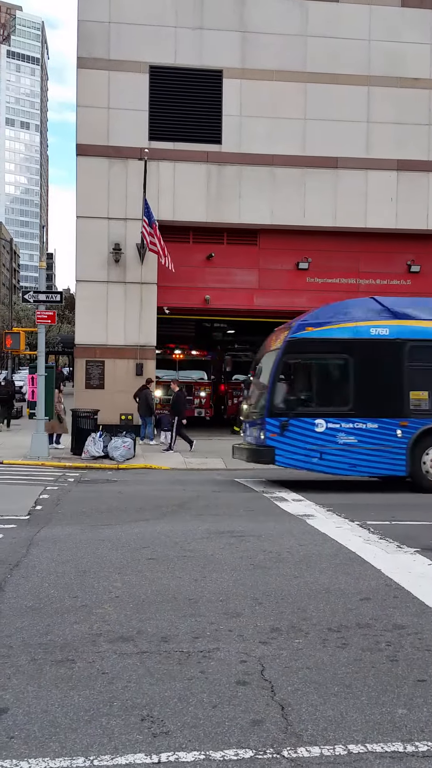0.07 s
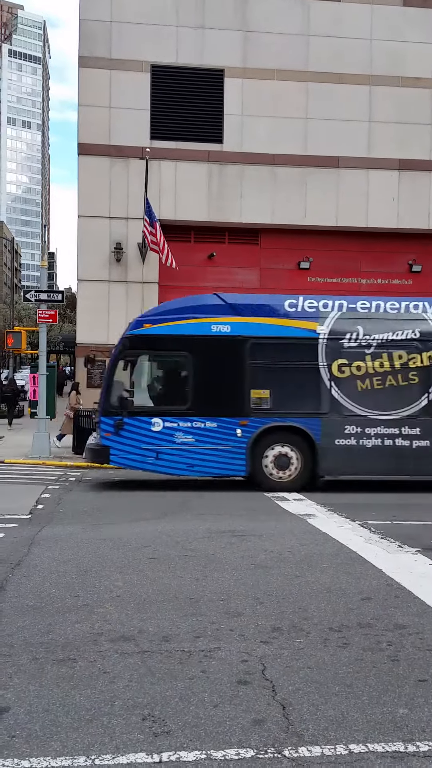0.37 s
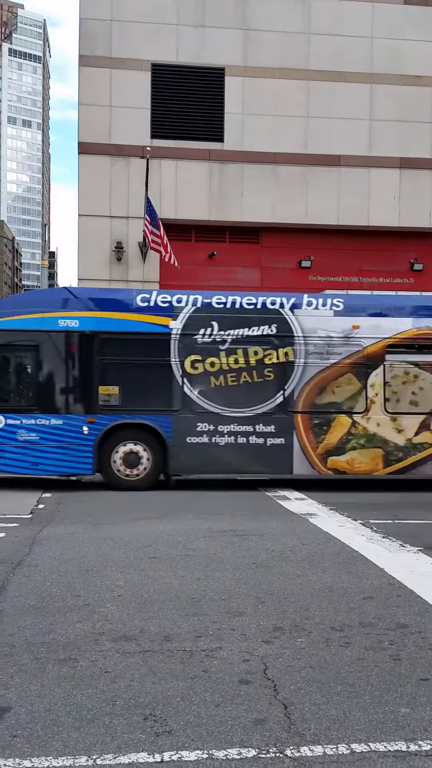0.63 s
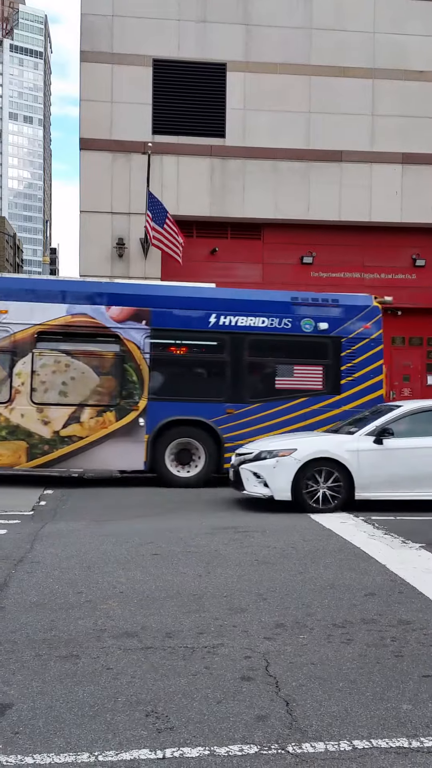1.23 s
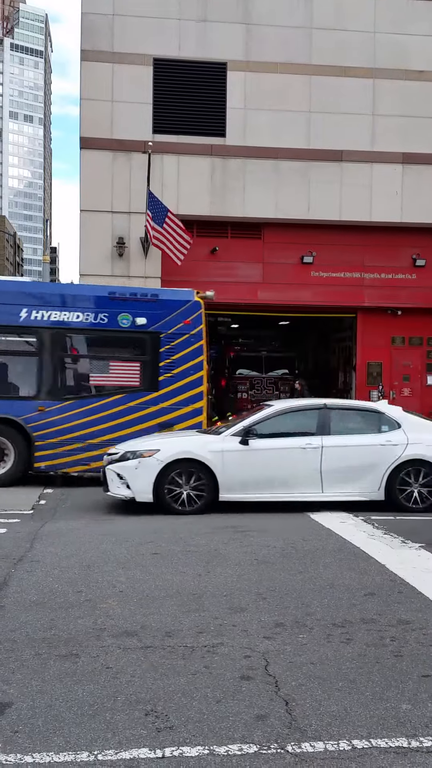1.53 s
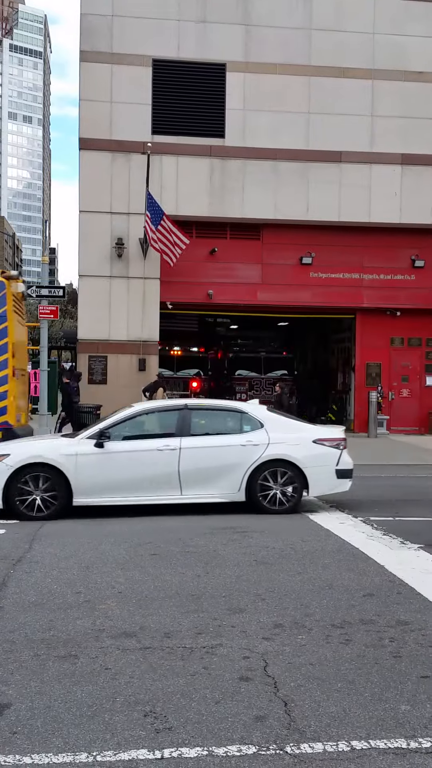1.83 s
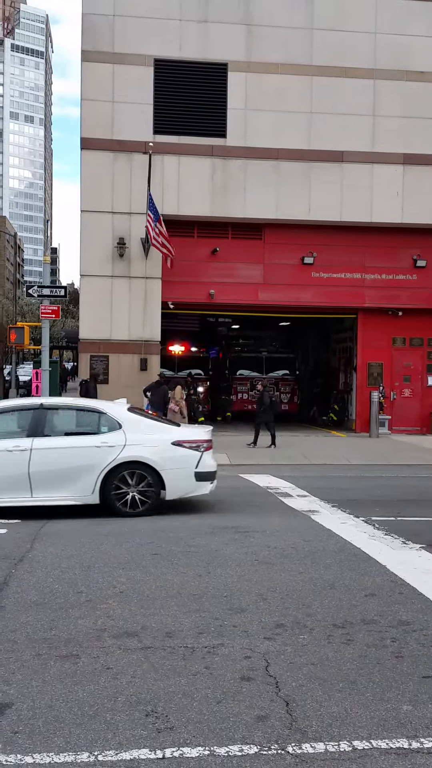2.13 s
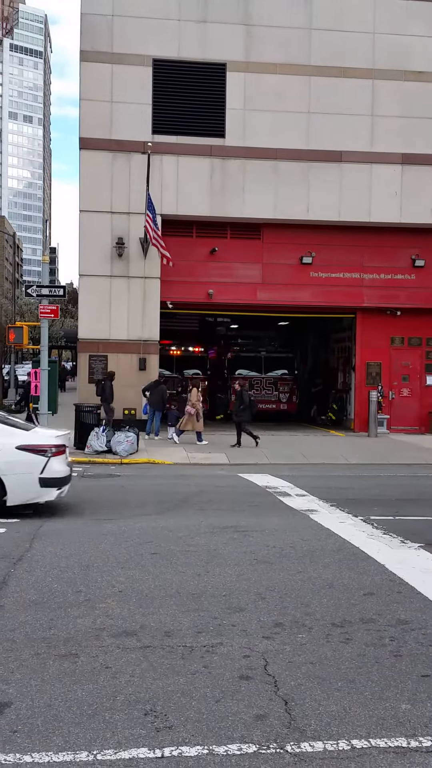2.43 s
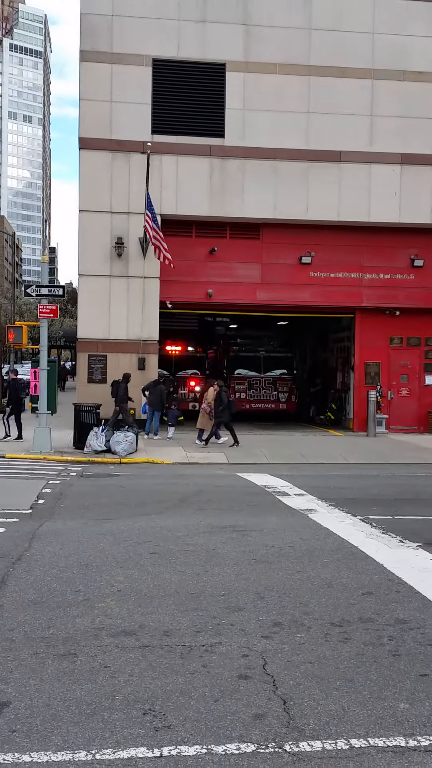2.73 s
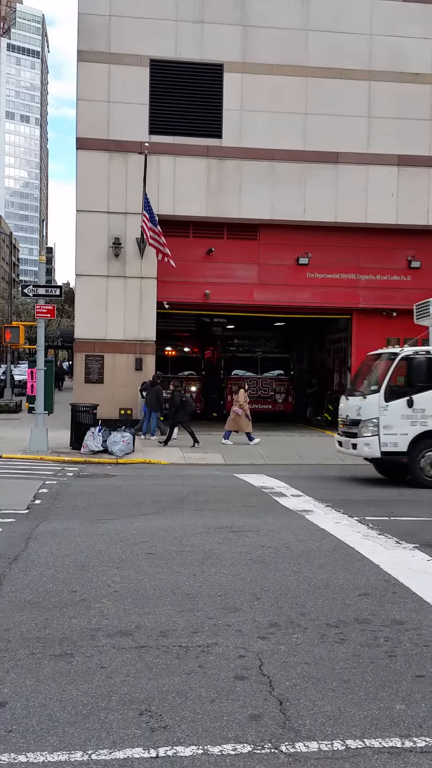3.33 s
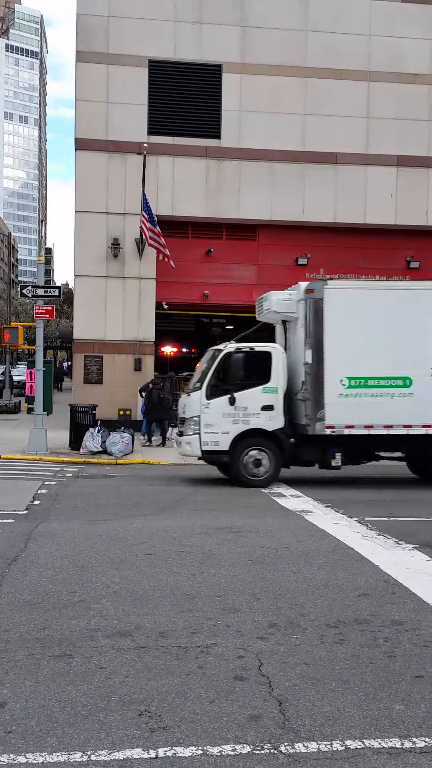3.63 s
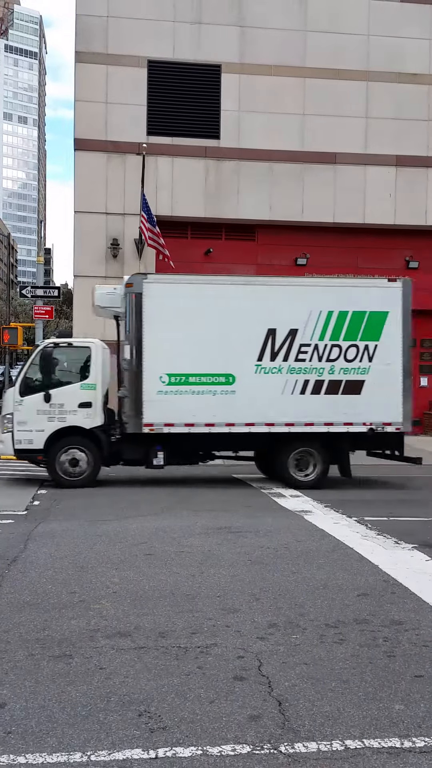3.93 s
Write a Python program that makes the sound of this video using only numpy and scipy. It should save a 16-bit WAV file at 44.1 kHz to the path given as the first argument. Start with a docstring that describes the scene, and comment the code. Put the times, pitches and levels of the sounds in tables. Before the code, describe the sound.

A city bus goes by with a low engine drone, a climbing turbo whistle, a wavering whine and a hiss of air. Tyre roar from a passing car and an approaching truck swells over steady street rumble.

```python
"""Hybrid city bus passing

Tyres roar and sing over the street rumble as a bus, a car and a box truck go by.
The bus's diesel drones, its turbo spools up to a high whistle and its electric drive whines;
air hisses once its rear has passed. Two microphone ports colour the treble differently."""
import sys
import numpy as np
from scipy import signal
from scipy.fft import rfft, irfft
from scipy.io import wavfile

SR = 44100
rng = np.random.default_rng(int(sys.argv[2]) if len(sys.argv) > 2 else 0)


def generate_wav(signal):
    """Clip the signal to [-1, 1] and save it as 16-bit WAV at the path in sys.argv[1]."""
    frames = np.transpose(np.atleast_2d(signal))
    scaled = np.clip(frames, -1, 1) * 32767
    pcm = np.round(scaled).astype(np.int16)
    wavfile.write(sys.argv[1], SR, pcm)


N = 176400


def undb(db):
    """Decibels to gain."""
    return 10 ** (np.asarray(db) / 20)


def unit_rms(x):
    """Scale to rms 1."""
    return x / np.sqrt(np.mean(np.abs(x) ** 2))


def over_time(table):
    """Columns of a time table, interpolated per sample."""
    times_s, *columns = np.array(table, float).T
    return [np.interp(np.arange(N) / SR, times_s, col) for col in columns]


def over_frequency(table):
    """Columns of a frequency table, interpolated per FFT bin on a log axis."""
    points_hz, *columns = np.array(table, float).T
    bins_hz = np.maximum(np.fft.rfftfreq(N, 1 / SR), 1)
    return np.array([np.interp(np.log(bins_hz), np.log(points_hz), col) for col in columns])


def bell(peak_s, sigma_s):
    """Gaussian envelope, peak 1."""
    return np.exp(-.5 * ((np.arange(N) / SR - peak_s) / sigma_s) ** 2)


def flutter(width_hz):
    """Complex low-pass noise, rms 1."""
    hz = np.fft.fftfreq(N, 1 / SR)
    re, im = rng.standard_normal((2, N))
    return unit_rms(np.fft.ifft((re + 1j * im) / (1 + (2 * hz / width_hz) ** 4) ** .5))


def drift(rate_hz):
    """Slow random wander, rms 1."""
    return unit_rms(flutter(2 * rate_hz).real)


def phase_of(hz):
    """Running phase of a pitch curve, random start."""
    return 2 * np.pi * (np.cumsum(hz) / SR + rng.random())


def rough_tone(phase, rough, width_hz):
    """Mono tone that shakes in level and pitch."""
    return unit_rms(((1 + rough * flutter(width_hz)) * np.exp(1j * phase)).real)


def scattered_tone(phase, width_hz):
    """Tone smeared by turbulence and reflections, differently at each port."""
    return unit_rms(np.array([(flutter(width_hz) * np.exp(1j * phase)).real for _ in range(2)]))


def swells(table, rough, width_hz):
    """Sum of rough tones, each under a bell envelope."""
    return sum(undb(db) * bell(peak_s, sigma_s) * rough_tone(phase_of(np.full(N, hz)), rough, width_hz)
               for peak_s, sigma_s, hz, db in table)


# Left/right coherence (frequency [Hz], correlation [-])
COHERENCE = [(30, .85), (80, .87), (280, .96), (600, .87), (1200, .73), (1800, .55), (2500, .3), (4000, .3),
             (7000, .03)]

def stereo_noise(spectrum):
    """Coloured noise, rms 1; channels alike in the bass, unrelated in the treble."""
    correlation = np.clip(over_frequency(COHERENCE)[0], -1, 1)
    mid, side = rfft(rng.standard_normal((2, N)))
    channels = mid * np.sqrt(1 + correlation) + side * np.sqrt(1 - correlation) * np.array([[1], [-1]])
    return unit_rms(irfft(channels * undb(over_frequency(spectrum)), N))


# Street background (frequency [Hz], relative density [dB])
STREET_SPECTRUM = [(100, -7), (700, 5.5), (1800, -12), (3000, -15), (4300, -15.5), (5200, -26), (6500, -34),
                   (8500, -42), (10500, -28), (12300, -22), (14000, -28), (16000, -32)]

def street(level_db=-41):
    """Steady wash of the distant street."""
    return undb(level_db) * stereo_noise(STREET_SPECTRUM)


# Traffic envelopes (time [s], rumble level [dB], roar level [dB])
TRAFFIC_LEVELS = [(0, -22.5, -36), (.35, -26.5, -35.5), (.8, -25.5, -32.5), (1.1, -23.5, -31),
                  (1.4, -24, -28.5), (1.62, -20.5, -28), (2, -22.5, -27), (2.4, -21, -25.5),
                  (3, -22.5, -31), (3.5, -22.5, -31.5), (4, -20.5, -31.5)]
# Rumble (frequency [Hz], relative density [dB])
RUMBLE_SPECTRUM = [(12, -13), (24, -20), (33, -15), (41, -2.5), (55, 0.5), (85, -3.5), (130, -3),
                   (190, -4.5), (260, -7), (320, -14.5), (450, -21.5), (900, -69)]
# Tyre roar (frequency [Hz], relative density [dB])
ROAR_SPECTRUM = [(150, 0.5), (350, 0), (480, 0.5), (620, 3), (820, -2), (1100, 0), (1350, -3.5),
                 (1550, -6.5), (1950, -7), (2300, -15.5), (3000, -15.5), (3600, -24), (4300, -18.5),
                 (5500, -32), (8000, -64)]

def traffic():
    """Low rumble and the broad roar of rolling tyres."""
    rumble_db, roar_db = over_time(TRAFFIC_LEVELS)
    return undb(rumble_db) * stereo_noise(RUMBLE_SPECTRUM) + undb(roar_db) * stereo_noise(ROAR_SPECTRUM)


# Tread song (time [s], centre [Hz], level [dB])
TREAD_SONG = [(0, 1772, -73), (1.6, 1800, -48), (2, 1822, -35.5), (2.25, 1644, -34), (2.5, 1702, -30.5),
              (2.85, 1745, -31), (3.15, 1831, -32), (3.38, 1726, -34.5), (3.52, 1657, -34),
              (3.68, 1662, -31), (3.87, 1744, -34), (4, 1750, -36.5)]

def treads(crossfeed=.3):
    """Tyre treads sing in a gliding band; part reaches both ports alike."""
    hz, db = over_time(TREAD_SONG)
    song = scattered_tone(phase_of(hz), width_hz=250)
    return undb(db) * unit_rms(song + crossfeed * song.sum(axis=0))


# Vehicle drones (peak time [s], sigma [s], pitch [Hz], relative level [dB])
DRONE_SWELLS = [(0.055, 0.3, 197.4, -30), (.1, 0.071, 250.3, -30.5), (0, 0.051, 100.4, -21.5),
                (.62, 0.3, 54.33, -31), (1.15, 0.24, 269.3, -32), (1.25, 0.35, 198.6, -30.5),
                (1.62, 0.28, 126.8, -27), (1.77, 0.24, 216, -28.5), (2, 0.18, 161.3, -28),
                (2.05, 0.44, 71.84, -28), (2.55, 0.21, 276.5, -37.5), (2.8, 0.23, 55.17, -32),
                (3.096, 0.68, 227.8, -31.5), (3.73, .13, 83, -25)]

def drones(gain_db=1):
    """Low engine and body tones swell as vehicles go by."""
    return undb(gain_db) * swells(DRONE_SWELLS, rough=.18, width_hz=4.9)


# Squeaks (peak time [s], sigma [s], pitch [Hz], level [dB])
SQUEAK_SWELLS = [(.2, 0.032, 1820, -45), (1.84, .008, 11230, -37), (1.99, 0.11, 1340, -39.5),
                 (2.02, .06, 1795, -42)]

def squeaks():
    """Faint, short squeaks from the moving vehicles."""
    return swells(SQUEAK_SWELLS, rough=.3, width_hz=40)


# Truck tyre envelope (time [s], level [dB])
TRUCK_LEVEL = [(1.6, -62), (2.4, -36), (3.1, -32.5), (4, -37.5)]
# Truck tyre roar (frequency [Hz], relative density [dB])
TRUCK_SPECTRUM = [(300, -18), (500, -1), (720, 7), (1000, -0.5), (1400, 2), (2300, -6), (3000, -6),
                  (3700, -11), (4400, -11), (6000, -19.5), (8000, -73)]

def truck_tyres():
    """A brighter roar grows as the truck draws near."""
    db, = over_time(TRUCK_LEVEL)
    return undb(db) * stereo_noise(TRUCK_SPECTRUM)


# Hiss envelope (time [s], level [dB])
AIR_LEVEL = [(0, -80), (.3, -78), (.7, -56.5), (1.3, -49.5), (1.585, -46.5), (1.625, -39.5), (1.73, -39),
             (1.88, -40.3), (2.22, -40.7), (2.45, -42), (2.55, -44), (2.8, -43), (3.3, -48.3), (4, -49.3)]
# Spurts (peak time [s], sigma [s], rise [dB])
AIR_SPURTS = [(.675, .014, 7), (1.948, .016, 5), (2.165, .025, 4)]
# Hiss (frequency [Hz], relative density [dB])
AIR_SPECTRUM = [(1500, -23), (3000, -0.5), (4500, 0.5), (6000, 7), (8000, 1), (11000, 7.5), (13000, 3.5),
                (16000, 4)]

def air_hiss():
    """Air flutters and spurts from the rear of the bus, louder once the rear has passed."""
    db, = over_time(AIR_LEVEL)
    spurts_db = sum(rise_db * bell(peak_s, sigma_s) for peak_s, sigma_s, rise_db in AIR_SPURTS)
    flicker_db = .6 * drift(rate_hz=21)
    return undb(db + spurts_db + flicker_db) * stereo_noise(AIR_SPECTRUM)


# Drive whine (time [s], pitch [Hz], level [dB])
DRIVE_WHINE = [(1.1, 3980, -66), (1.28, 4050, -53), (1.44, 4050, -53), (1.565, 4060, -49), (1.6, 4040, -43),
               (1.775, 4035, -46.5), (1.91, 4080, -44), (2.01, 4170, -45), (2.05, 4190, -62),
               (2.115, 4250, -45), (2.23, 4275, -47), (2.275, 4275, -42), (2.42, 4280, -66),
               (2.495, 4195, -45), (2.55, 4160, -53), (2.615, 4195, -45), (2.75, 4290, -64),
               (2.8, 4305, -46), (2.88, 4315, -47.5), (2.93, 4330, -64), (3.06, 4350, -62),
               (3.095, 4365, -48), (3.14, 4400, -63), (3.47, 4450, -58), (3.77, 4460, -64),
               (3.82, 4460, -51), (4, 4455, -54)]

def electric_drive(waver_hz=7):
    """Thin, wavering whine of the electric drive, flickering in level."""
    hz, db = over_time(DRIVE_WHINE)
    phase = phase_of(hz + waver_hz * drift(rate_hz=22))
    whine = rough_tone(phase, rough=.35, width_hz=70) + .35 * scattered_tone(phase, width_hz=70)
    return undb(db) * unit_rms(whine)


# Spool-up (time [s], pitch [Hz])
TURBO_SPOOL = [(0, 9600), (.25, 10100), (.55, 10730), (.85, 11040), (1.1, 11260), (1.5, 11520),
               (1.75, 11630), (2, 11720), (2.4, 11820), (2.9, 11825), (3.4, 11775), (4, 11690)]
# Whistle envelope (time [s], level [dB])
TURBO_LEVEL = [(0, -88), (.25, -66), (.55, -56.5), (.85, -60), (1.1, -48), (1.5, -43.5), (1.75, -39),
               (2, -44.5), (2.4, -43), (2.9, -44.5), (3.4, -45.5), (4, -51.5)]
# Whistle core and skirts (width [Hz], relative level [dB])
TURBO_BANDS = [(45, -4), (230, -5), (750, -7)]

def turbo(waver_hz=14):
    """The turbo spools up: a narrow whistle inside a skirt of rushing air."""
    hz, = over_time(TURBO_SPOOL)
    db, = over_time(TURBO_LEVEL)
    phase = phase_of(hz + waver_hz * drift(rate_hz=17.5))
    flicker_db = drift(rate_hz=5)
    whistle = sum(undb(band_db) * scattered_tone(phase, width_hz) for width_hz, band_db in TURBO_BANDS)
    return undb(db + flicker_db) * whistle


# Bus engine (time [s], firing rate [Hz], level [dB])
DIESEL_RUN = [(0, 103.8, -36), (.5, 107, -28.5), (.74, 105.9, -32), (.84, 107.3, -43), (.95, 105.9, -23),
              (1.4, 106.6, -31.5), (1.8, 107.7, -30), (2.17, 109.3, -32), (2.27, 110.7, -19),
              (2.5, 109.6, -24), (2.8, 109.6, -19.5), (3.5, 110.6, -23.5), (4, 111.2, -24.5)]
# Exhaust partials (multiple of half the firing rate [-], relative level [dB])
DIESEL_ORDERS = [(1, -13), (2, -1), (3, -9), (4, -16.5), (5, -16.5), (6, -21.5)]

def diesel():
    """Exhaust partials of the bus, locked to the firing rate."""
    firing_hz, db = over_time(DIESEL_RUN)
    phase = phase_of(firing_hz / 2)
    exhaust = sum(undb(order_db) * rough_tone(round(order) * phase, rough=.18, width_hz=20)
                  for order, order_db in DIESEL_ORDERS)
    return undb(db) * exhaust


def scene():
    """Bus and other vehicles over the distant street."""
    bus = diesel() + turbo() + electric_drive() + air_hiss()
    return bus + truck_tyres() + drones() + treads() + traffic() + squeaks() + street()


# Microphone ports (frequency [Hz], left gain [dB], right gain [dB])
PORT_RESPONSE = [(60, 0, 0), (700, -.8, .8), (1100, -2, 1.5), (1700, -4, 3), (2000, -2, 2), (2300, 1, -2),
                 (3000, -.5, 2), (3600, -1, -1.5), (4100, .3, .7), (4500, 2.7, -2.5), (5200, 2.5, -6.5),
                 (7000, -2.5, -8), (9100, 0, 2), (9800, -14, 4), (10500, -14, 7.5), (11500, -1, 16),
                 (12500, -.5, 15), (13500, -2, 12), (14000, -6, 11), (14700, 0, 9.5), (16000, 1, 10)]

def record(dry):
    """Each port colours its channel; the ends fade and a steep low-pass cuts the top."""
    fade_s, cutoff_hz = .004, 15800
    t = np.arange(N) / SR
    to_edge_s = np.minimum(t, t[-1] - t)
    fade = np.sin(np.pi / 2 * np.clip(to_edge_s / fade_s, 0, 1)) ** 2
    coloured = irfft(rfft(dry * fade) * undb(over_frequency(PORT_RESPONSE)), N)
    lowpass = signal.ellip(12, .2, 90, cutoff_hz, fs=SR, output="sos")
    return signal.sosfilt(lowpass, coloured)


dry = scene()
out = record(dry)
generate_wav(out)
```